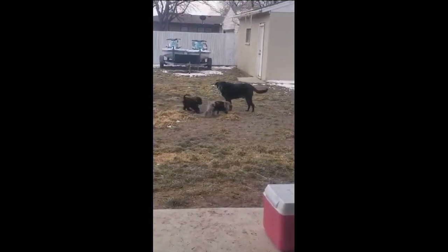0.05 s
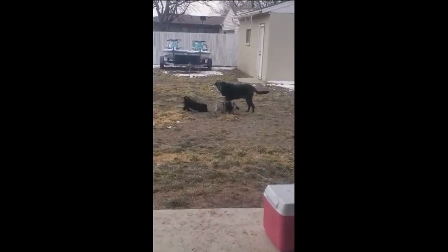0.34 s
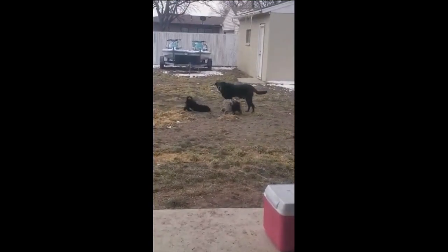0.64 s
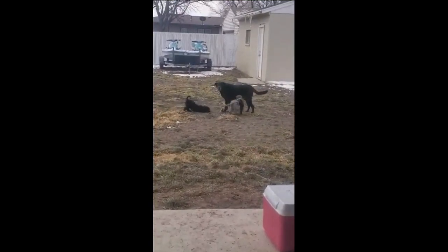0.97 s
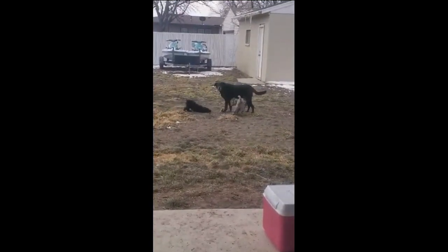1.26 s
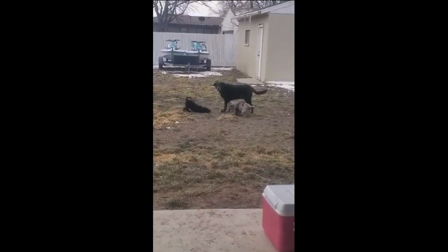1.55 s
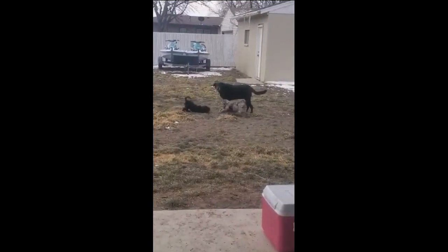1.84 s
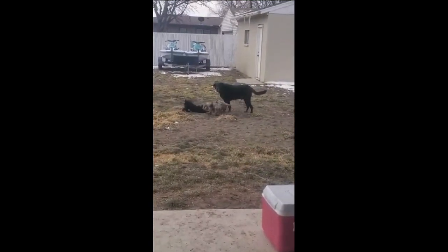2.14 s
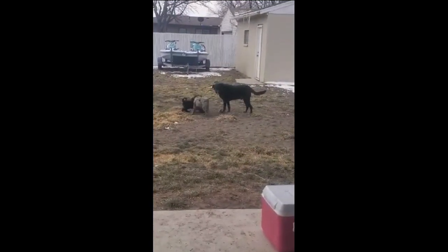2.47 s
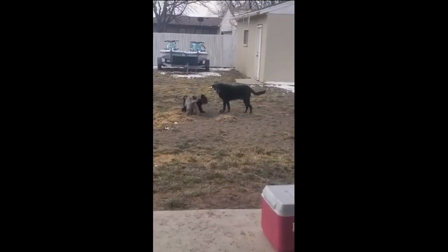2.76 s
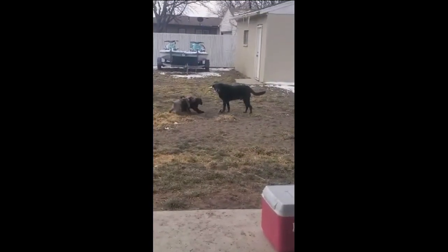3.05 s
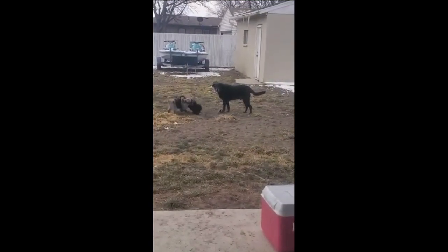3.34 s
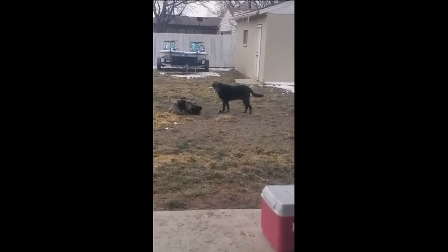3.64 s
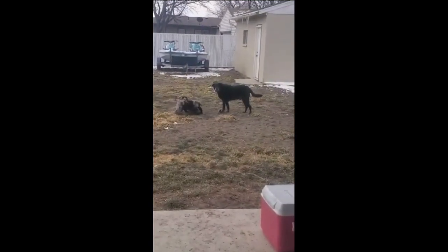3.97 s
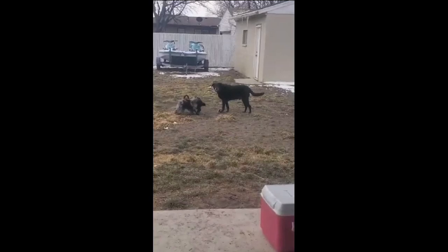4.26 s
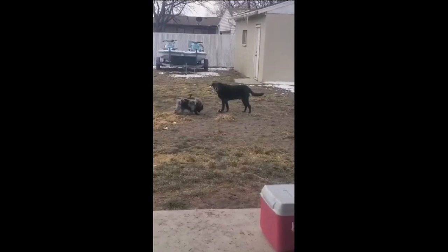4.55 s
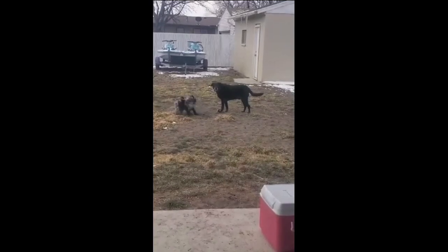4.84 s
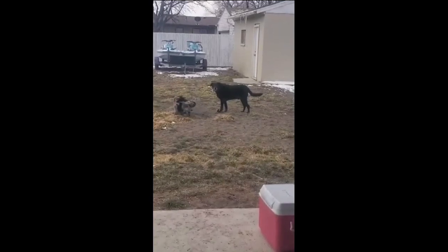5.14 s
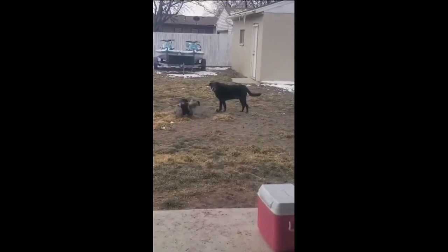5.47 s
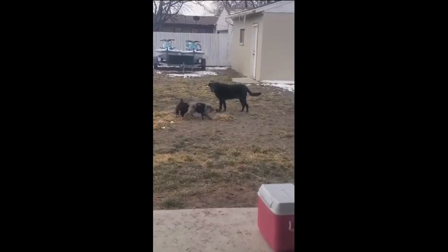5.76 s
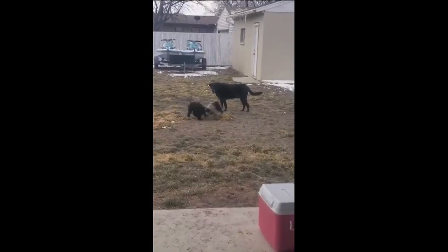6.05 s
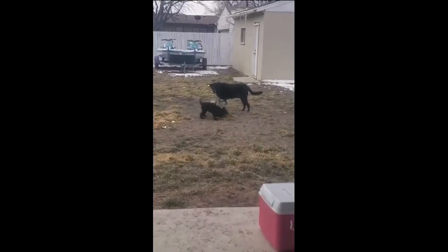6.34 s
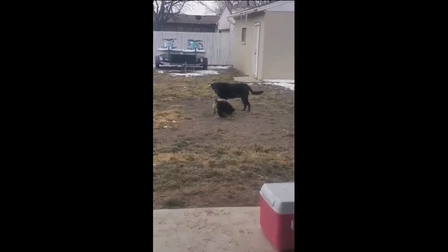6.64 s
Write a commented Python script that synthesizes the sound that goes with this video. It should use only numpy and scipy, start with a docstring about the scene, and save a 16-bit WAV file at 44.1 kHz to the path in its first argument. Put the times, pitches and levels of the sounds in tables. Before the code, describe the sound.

A few high puppy yips rise out of low growls outdoors, over lightly tinkling collar tags, soft microphone bumps and far traffic.

```python
"""A back lawn, the microphone some way from wrestling puppies. Four arching yips rise out of a low growl and
sink back into it, vocal folds sounding through throat and muzzle, answered by the fence and the garage wall.
Metal collar tags jingle faintly; soft swells of noise and a few sharp ticks come and go apart from them. The
microphone takes a few soft bumps, and distant traffic rumbles behind."""
import sys
import numpy as np
from scipy import signal
from scipy.fft import rfft, irfft, next_fast_len
from scipy.io import wavfile
from scipy.ndimage import map_coordinates

SR = 44100
rng = np.random.default_rng(int(sys.argv[2]) if len(sys.argv) > 2 else 0)


def to_wav(sig):
    """Store sig (one row per channel, or 1-D mono) as 16-bit WAV at the path in sys.argv[1].

    Samples outside -1..1 are clipped; the rate is SR.
    """
    pcm = np.clip(np.atleast_2d(sig), -1, 1) * 32767
    pcm = np.round(pcm).astype(np.int16)
    wavfile.write(sys.argv[1], SR, pcm.T)  # frames by channels


N = 300010

# metal tags scraping on each other: (frequency [Hz], relative level [dB])
TAG_SCRAPE = [(6500, -19.5), (7400, -18), (8300, -17), (9500, 1), (10600, -5.5), (11600, 3.5), (12800, -4),
              (13500, -36)]


def amp(db):
    return 10 ** (np.asarray(db) / 20)


def unit(x):
    """x at rms 1."""
    return x / np.sqrt(np.mean(x ** 2) + 1e-20)


def along(points, hz):
    """Read (frequency [Hz], value) points at hz, on a log axis."""
    knots_hz, values = np.transpose(points)
    return np.interp(np.log(hz + 1), np.log(knots_hz + 1), values)


def wobble(rate, size=N):
    """A smooth random curve, rate knots a second."""
    knots = rng.standard_normal(int(size * rate / SR) + 4)
    return map_coordinates(knots, [np.arange(size) * rate / SR])


def filtered(x, response):
    """x through a gain that depends on frequency."""
    size = next_fast_len(len(x) + SR // 10)
    return irfft(rfft(x, size) * response(np.fft.rfftfreq(size, 1 / SR)), size)[:len(x)]


def coloured(x, spectrum):
    """x shaped by (frequency [Hz], level [dB]) points, at rms 1."""
    return unit(filtered(x, lambda hz: amp(along(spectrum, hz))))


def noise(spectrum, size=N):
    """Coloured noise at rms 1."""
    return coloured(rng.standard_normal(size), spectrum)


def add(track, start_s, sound):
    """Mix a sound into a track."""
    part = track[max(round(start_s * SR), 0):][:len(sound)]
    part += sound[:len(part)]


def far_traffic(rumble_gain_db=1, wash_db=-55):
    """Traffic in the distance: a low, uneven rumble under a nearly steady wash."""
    # course of the rumble: (time [s], level before the gain [dB])
    swells = [(0.0, -41.5), (0.3, -48.5), (2.84, -50), (3.09, -47), (3.41, -50.5), (5.72, -48.5),
              (6.17, -54), (6.8, -51)]
    # colours of the rumble and the wash: (frequency [Hz], relative density [dB])
    rumble_colour = [(12, -32), (20, -19), (47, -1), (69, 2.5), (119, -4.5), (160, -8), (177, -26),
                     (226, -16.5), (260, -20), (340, -41), (570, -120)]
    wash_colour = [(150, 3.5), (280, -1), (500, -6), (800, -10), (1100, -15), (1350, -5.5), (1700, -13.5),
                   (2100, -15.5), (2480, -32.5), (2900, -23), (3700, -21.5), (4600, -35.5), (6000, -46.5),
                   (15000, -54)]
    swell_db = np.interp(np.arange(N) / SR, *np.transpose(swells))
    rumble = amp(swell_db + rumble_gain_db + 3 * wobble(9)) * noise(rumble_colour)
    wash = amp(wash_db + 0.69 * wobble(8.9)) * noise(wash_colour)
    return rumble + wash


def far_machinery():
    """A few distant machine tones waver in level and phase."""
    # the hum: (frequency [Hz], level [dB])
    tones = [(120, -55), (226, -86.5), (301.5, -61.5), (339, -63.5), (490, -66), (560, -70.5),
             (1254, -72.5)]
    t = np.arange(N) / SR
    return sum(amp(db + 2 * wobble(6)) * np.sin(2 * np.pi * hz * t + 1.3 * wobble(14))
               for hz, db in tones)


def clink(dull, ring_db=-17, clash_db=-10, clash_t60=0.093, attack_s=0.002, shimmer_db=3.5, detune_hz=45):
    """One touch of the thin metal tags: modes ring at new strengths; dull (0-1) trades ring for scrape."""
    # ringing of the tags: (frequency [Hz], relative level [dB], t60 [s])
    modes = [(7390, -15, .35), (7520, -21, .15), (9060, -17, .15), (9330, -9, .35), (9560, -15, .15),
             (9810, -8, .3), (10120, -13, .2), (11150, -11, .15), (11280, -3, .35), (11345, -4, .35),
             (11520, -11, .2), (11820, -8, .2), (12100, -13, .15), (12650, -12, .15), (15200, -27, .2)]
    t = np.arange(SR // 3) / SR
    hz, db, t60 = np.transpose(modes)[:, :, None]
    strength, detune, phase = rng.standard_normal((3, len(modes), 1))
    # the tags swing and brush each other, so their modes swell and dip
    swing = np.array([wobble(65, len(t)) for _ in range(3)])[np.arange(len(modes)) % 3]
    level = amp(db + 3 * strength + shimmer_db * swing - 60 * t / t60)
    ring = np.sum(level * np.sin(2 * np.pi * ((hz + detune_hz * detune) * t + phase)), axis=0)
    clash = noise(TAG_SCRAPE, len(t)) * amp(-60 * t / clash_t60)
    onset = 1 - np.exp(-t / attack_s)
    return onset * (amp(ring_db) * np.sqrt(1 - dull) * ring + amp(clash_db) * np.sqrt(dull) * clash)


def tinkle(length_s, touches_per_s=14):
    """Light touches of the tags at an uneven pace, at about rms 1."""
    out = np.zeros(int(length_s * SR) + SR // 3)
    for k in range(int(length_s * touches_per_s) + 1):
        start = (k + rng.uniform(0, 1)) / touches_per_s
        add(out, start, amp(rng.normal(0, 2.6)) * clink(dull=0.36))
    return out / np.sqrt(np.sum(out ** 2) / (length_s * SR))


def collar_tags(bounce_db=-6, slide_db=-87, slide_swing_db=4):
    """The tags touch and bounce once, tinkle as the dogs tumble, and slide lightly in between."""
    # the loudest touches: (time [s], gain [dB], dullness [0-1])
    touches = [(0.093, -44, 1), (.497, -45.5, 0), (0.55, -45.5, 0.16), (.76, -50.5, .05),
               (1.179, -49.5, .1), (1.517, -51, .05), (3.518, -52, 0.4), (3.939, -46, 1),
               (3.992, -41.5, 0.27), (4.052, -48.5, .95), (4.415, -40.5, .05), (4.638, -56, 0),
               (4.747, -44, .05), (4.775, -46.5, 1), (4.992, -42, 0.72), (5.258, -48.5, 0.4),
               (5.587, -49, 0.6), (6.348, -57, .1), (6.539, -45, .05), (6.581, -44.5, 1)]
    # tumbles that keep the tags tinkling: (time [s], length [s], level [dB])
    tumbles = [(0, .28, -73), (1.036, .62, -81), (3.495, .35, -80), (3.901, 0.69, -74.5),
               (5.152, 0.35, -78), (6.241, 0.43, -76.5)]
    out = noise(TAG_SCRAPE) * amp(slide_db + slide_swing_db * wobble(8.7))
    for start, db, dull in touches:
        dull = max(dull, 0.05)
        add(out, start, amp(db) * clink(dull))
        add(out, start + rng.uniform(0.0065, 0.073), amp(db + bounce_db) * clink(dull))
    for start, length, db in tumbles:
        add(out, start, amp(db) * tinkle(length))
    return out


def soft_swells(log_width=0.39):
    """A faint, slow swell of low-mid background noise, then three brief swells of narrow noise."""
    # each swell: (time [s], length [s], level at its middle [dB], band centre [Hz])
    swells = [(0.348, 0.83, -63.5, 644), (0.809, 0.13, -62.5, 1570), (1.739, 0.14, -54.5, 278),
              (6.553, 0.16, -70, 590)]
    out = np.zeros(N)
    for start, length, db, centre_hz in swells:
        size = int(length * SR)
        band = lambda hz: np.exp(-(np.log((hz + 1) / centre_hz) / log_width) ** 2)
        narrow_noise = unit(filtered(rng.standard_normal(size), band))
        add(out, start, amp(db) * narrow_noise * np.hanning(size))
    return out


def ticks(tick_gain_db=8, crackle_db=-52, crackle_count=170):
    """A few sharp ticks over a very faint random crackle, each a single impulse."""
    # the sharpest ticks: (time [s], level before the gain [dB])
    sharp_ticks = [(1.18, -45.5), (1.392, -55.5), (1.6912, -52.5), (1.8822, -53.5), (2.5442, -38),
                   (2.908, -47.5), (2.9489, -45), (3.695, -47.5), (3.804, -50), (4.6153, -51), (5.318, -37),
                   (5.7881, -49)]
    out = np.zeros(N)
    spread_db = rng.uniform(-7, 5, crackle_count)
    out[rng.integers(0, N, crackle_count)] = amp(crackle_db + spread_db)
    for start, db in sharp_ticks:
        add(out, start, amp([db + tick_gain_db]))
    return out


def growl(pitch, effort, slowest_hz=107.27, jitter=0.1203, loudest_effort=0.46, effort_spread=0.23):
    """At low effort the slack folds flap unevenly into the chest, at about half the pitch."""
    # resonance of the chest: (frequency [Hz], relative gain [dB])
    chest = [(70, -38), (150, 4.5), (280, -4), (450, -6.5), (900, -33), (2000, -54)]
    size = len(pitch)
    flap_hz = np.hypot(slowest_hz, pitch / 2) * (1 + jitter * wobble(120, size))
    cycles = np.cumsum(flap_hz) / SR
    pulses = np.diff(np.floor(cycles), prepend=0) * amp(5 * wobble(150, size))
    return coloured(pulses, chest) * np.exp(-((effort - loudest_effort) / effort_spread) ** 2 / 2)


def effort_arch(crest, rise, hold, fall, flatness, collapse=0.2):
    """Times around a yip and its effort (0-1): it swells to the crest, holds, then drops and collapses."""
    t = np.arange(round((crest - 2.2 * rise) * SR), round((crest + hold + 2.1 * fall) * SR)) / SR
    before = np.maximum((crest - t) / rise, 0)
    after = np.maximum((t - crest - hold) / fall, 0)
    return t, 1 / (1 + before ** flatness + after + collapse * after ** 3)


def voice(pitch, open_db, doubling, rough, mouth, hiss_db, split_hz=1080, jitter=0.005, rasp=0.065):
    """Vocal folds sound through the mouth, with period doubling, hoarse air and a hiss at the teeth."""
    # hiss at the teeth: (frequency [Hz], relative level [dB])
    teeth = [(4500, -10), (6500, -20), (7800, -11.5), (8700, -3.5), (10800, -3.5), (11800, 0.5),
             (12700, -2.5), (13400, -23)]
    size = len(pitch)
    fold_hz = pitch * (1 + (jitter + rasp * rough) * wobble(362, size))
    phase = 2 * np.pi * np.cumsum(fold_hz) / SR
    order = np.arange(1, 33)[:, None] / 2
    hz = order * pitch
    # period doubling fills in the half orders
    gain = mouth(hz) * np.where(order % 1, doubling * np.minimum(order, 1) ** 2, 1)
    # an opening mouth shifts power from the low partials to the upper ones
    upper = 1 / (1 + (split_hz / hz) ** 16)
    unit_power = lambda g: g / np.sqrt(np.sum(g ** 2, axis=0) + 1e-12)
    gain = unit_power(unit_power(gain * (1 - upper)) + amp(open_db) * unit_power(gain * upper))
    # each partial flickers in level on its own, most where the voice is rough
    flicker = np.array([wobble(76.1, size) for _ in order])
    gain = unit_power(gain * amp((2 + 4 * rough) * flicker))
    partials = gain * np.sin(order * phase + rng.uniform(0, 2 * np.pi, order.shape))
    voiced = np.sqrt(2) * np.sum(partials, axis=0)
    puffs = 1 + np.cos(phase)  # air escapes once a cycle
    hoarse = unit(filtered(puffs * rng.standard_normal(size), mouth))
    hiss = coloured(puffs * rng.standard_normal(size), teeth)
    return np.sqrt(1 - rough ** 2) * voiced + rough * hoarse + amp(hiss_db) * hiss


def mouth_response(thin, muzzle_hz, muzzle_db, log_width=0.26):
    """Gain against frequency of the throat and mouth; the muzzle adds one upper resonance."""
    # throat in a full yip and in a thinner, wide-mouthed one: (frequency [Hz], relative gain [dB])
    full_throat = [(150, -6.5), (450, -7), (850, -3.5), (1060, -6.5), (1400, 8), (1780, 2), (2130, -9),
                   (2600, -20), (3300, -22), (3700, -29.5), (4150, -45.5), (5200, -53), (7000, -75)]
    thin_throat = [(150, -3), (550, -9.5), (850, -18), (1220, 5.5), (1500, 6.5), (1850, -3), (2200, -12.5),
                   (2600, -22), (3050, -15.5), (3650, -14.5), (4200, -17), (4650, -47), (7000, -76)]

    def response(hz):
        throat_db = (1 - thin) * along(full_throat, hz) + thin * along(thin_throat, hz)
        muzzle = np.exp(-(np.log((hz + 1) / muzzle_hz) / log_width) ** 2)
        return amp(throat_db + muzzle_db * muzzle)
    return response


def yips(push_db=3.5, push_s=0.012, sag_db_per_s=-81, flutter_db=2.17, catch_effort=0.46, reshape_s=0.033):
    """One arch of effort drives each yip: high and loud at the crest, hoarse and growling at both ends."""
    # each yip: (crest [s], pitch [Hz], voice level [dB], rise [s], hold [s], fall [s],
    #   flatness of the rise [exponent], climb in the hold [octaves/s], mouth opening on the rise [dB],
    #   on the fall [dB], period doubling on the rise [0-1], after the crest [0-1], roughness [0-1],
    #   thinness of the throat [0-1], muzzle resonance [Hz], its height [dB],
    #   hiss against the voice [dB], growl level [dB])
    calls = [(2.323, 865, -29, .073, 0.031, 0.076, 2.05, 2.5, 8.5, 8, 0, 0.41, 0.2, 0, 3280, 3, -39, -49),
             (2.823, 888.4, -29.5, 0.048, 0.032, 0.083, 3.4, -1.06, -1.5, 1, 1, 0.9, 0.26, 0.14, 2730, 9.5, -30.5, -49.5),
             (3.183, 879, -28, .092, .014, .04, 3.2, 1, -9, 7, 0.16, 0, 0.17, 0.16, 2920, 17.5, -29.5, -49),
             (4.95, 602, -36, .071, .02, 0.042, 2.7, 2.2, 6, 5.5, 0.47, 0.15, 0.01, 1, 3630, 7, -22.5, -58)]
    out = np.zeros(N)
    for (crest, crest_hz, db, rise, hold, fall, flatness, climb, rise_open_db, fall_open_db,
         rise_doubling, fall_doubling, rough, thin, muzzle_hz, muzzle_db, hiss_db, growl_db) in calls:
        t, effort = effort_arch(crest, rise, hold, fall, flatness)
        rising = t < crest
        held_s = np.clip(t - crest, 0, hold)
        push = np.exp(-((t - crest) / push_s) ** 2)  # of air, at the crest
        pitch = crest_hz * effort * 2 ** (climb * held_s)
        # a slack voice is softer, more closed and rougher
        slack = 1 - effort
        soften_db = np.where(rising, -39 * slack, -63.5 * slack ** 2)
        close_db = np.where(rising, -22, -55) * slack ** 2
        hoarseness = np.clip(rough + np.where(rising, 0.7, 0.29) * slack, 0, 0.9)
        level_db = db + soften_db + push_db * push + sag_db_per_s * held_s
        level_db += flutter_db * wobble(117.1, len(t))
        # the folds catch abruptly on the way up
        voicing = np.where(rising, (1 + np.tanh((effort - catch_effort) / 0.085)) / 2, 1)
        open_db = np.interp(t, [crest, crest + reshape_s], [rise_open_db, fall_open_db]) + close_db
        doubling = np.where(rising, rise_doubling, fall_doubling) * (1 - push)
        mouth = mouth_response(thin, muzzle_hz, muzzle_db)
        cry = voice(pitch, open_db, doubling, hoarseness, mouth, hiss_db)
        yip = amp(level_db) * voicing * cry + amp(growl_db) * growl(pitch, effort)
        add(out, t[0], yip * signal.windows.tukey(len(t), 0.15))
    return out


def yard(x, echo_gain_db=-1, scatter_db=-14, scatter_t60=0.21, tail_db=-20):
    """Fence and garage throw back a few echoes and a short scatter; the houses around add a faint tail."""
    # echoes at the microphone: (delay [s], level before the gain [dB])
    echoes = [(.019, -9), (.034, -12.5), (.056, -22), (.083, -22.5)]
    # decay among the houses: (frequency [Hz], t60 [s])
    decay = [(200, 0.37), (900, 0.93), (3000, 0.82), (10000, 0.29)]
    hz, frame_s, spectra = signal.stft(rng.standard_normal(SR), SR, nperseg=256)
    tail = signal.istft(spectra * amp(-60 * frame_s / along(decay, hz)[:, None]), SR, nperseg=256)[1]
    t = np.arange(len(tail)) / SR
    scatter = rng.standard_normal(len(t)) * amp(-60 * t / scatter_t60) * (t > 0.008)
    answer = amp(tail_db) * tail / np.linalg.norm(tail)
    answer += amp(scatter_db) * scatter / np.linalg.norm(scatter)
    for delay, db in echoes:
        add(answer, delay, amp([db + echo_gain_db]))
    return x + signal.fftconvolve(x, answer)[:N]


def rock(hz, cycles=2.37):
    """The microphone swings briefly to and fro, easing in and out."""
    t = np.arange(int(cycles / hz * SR)) / SR
    return np.sin(2 * np.pi * hz * t) * signal.windows.tukey(len(t), 0.7)


def microphone_bumps(knock_hz=190.6, overtone_db=-8, lag_s=0.00535):
    """A bump rocks the microphone for about two cycles; a hard one starts with a short knock."""
    # each bump: (time [s], peak of the rocking [dB], its frequency [Hz], hardness [0-1])
    bumps = [(2.528, -28, 64.7, 0.57), (3.231, -36.5, 49, 0.3), (5.256, -25, 79, 0.08),
             (5.294, -22, 67, 0.54), (5.51, -37, 79, 0.05), (5.577, -29.5, 74, 0.14),
             (6.556, -38, 61, 0.26)]
    out = np.zeros(N)
    for start, db, hz, hardness in bumps:
        add(out, start, hardness * amp(db) * rock(knock_hz))
        add(out, start + lag_s, hardness * amp(db + overtone_db) * rock(2 * knock_hz))
        add(out, start + lag_s, amp(db) * rock(hz))
    return out


def scene():
    """The lawn from one microphone: puppies some way off, traffic and machinery far behind."""
    puppies = yard(yips()) + collar_tags()
    return (puppies + soft_swells() + microphone_bumps() + ticks() + far_traffic() + far_machinery())[None]


def record(dry):
    """The recorder keeps nothing above its band limit."""
    top_hz = 16200
    return filtered(dry[0], lambda hz: hz < top_hz)[None]


dry = scene()
out = record(dry)
to_wav(out)
```